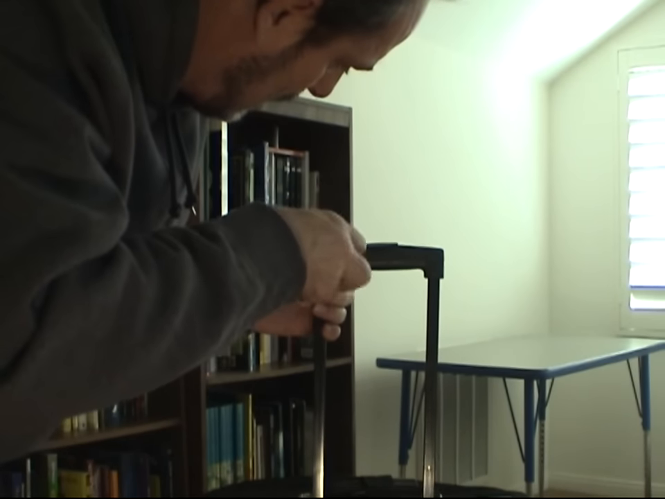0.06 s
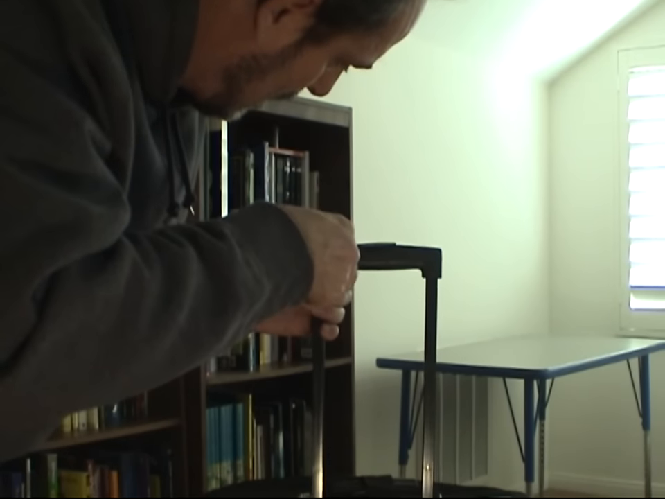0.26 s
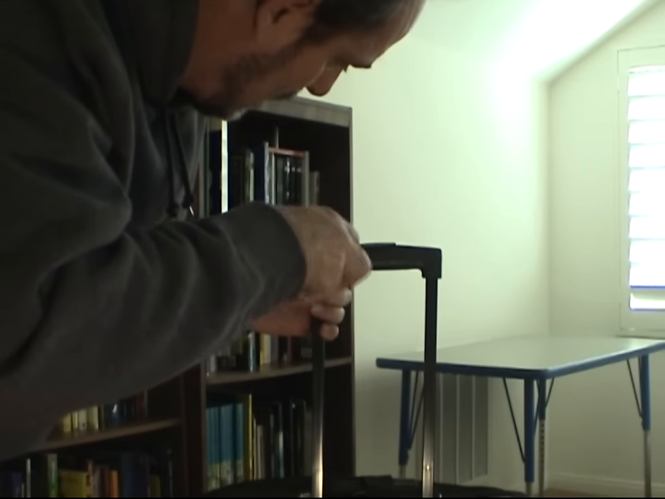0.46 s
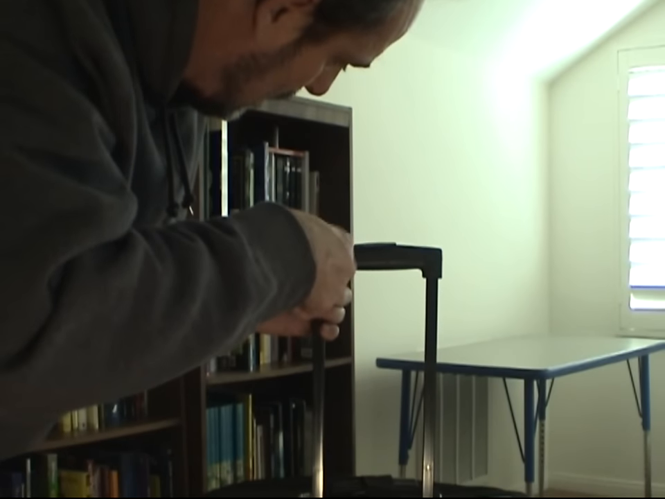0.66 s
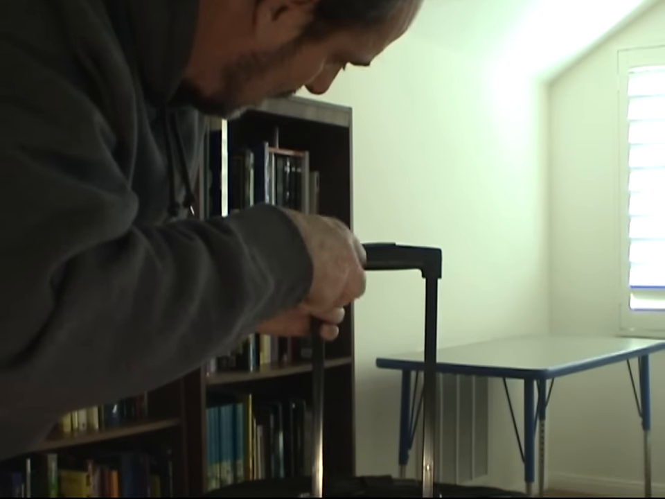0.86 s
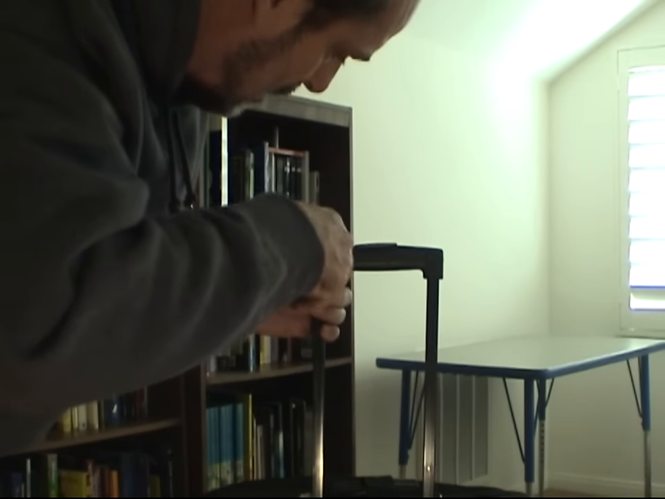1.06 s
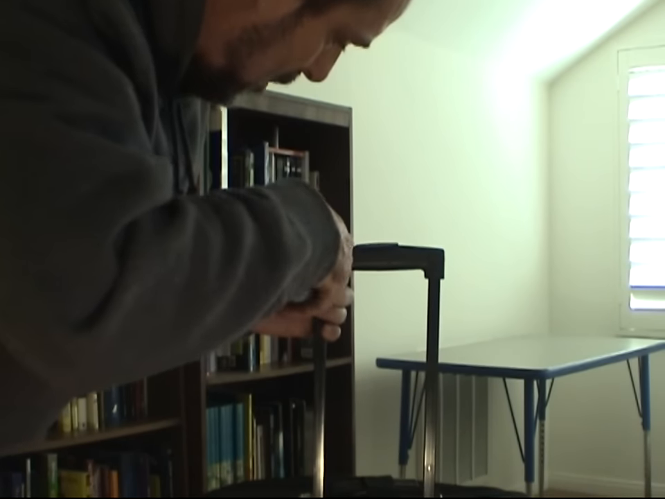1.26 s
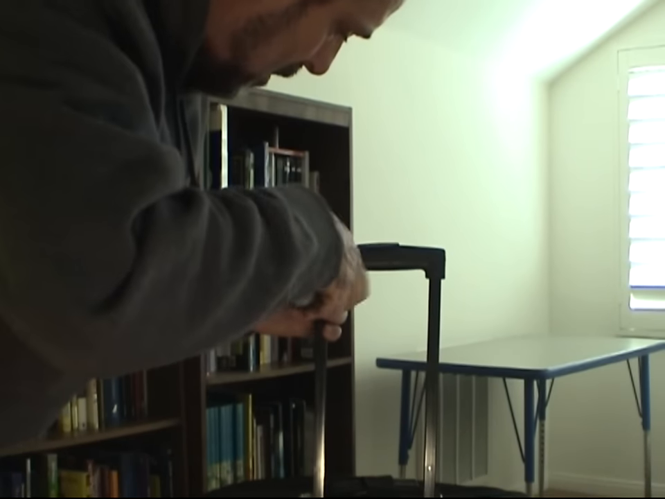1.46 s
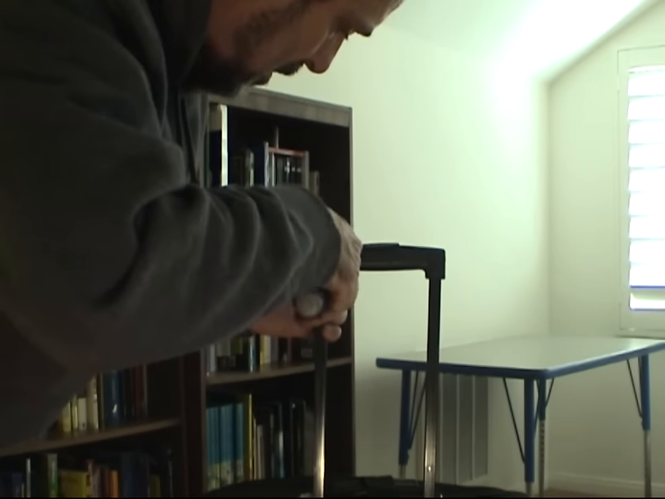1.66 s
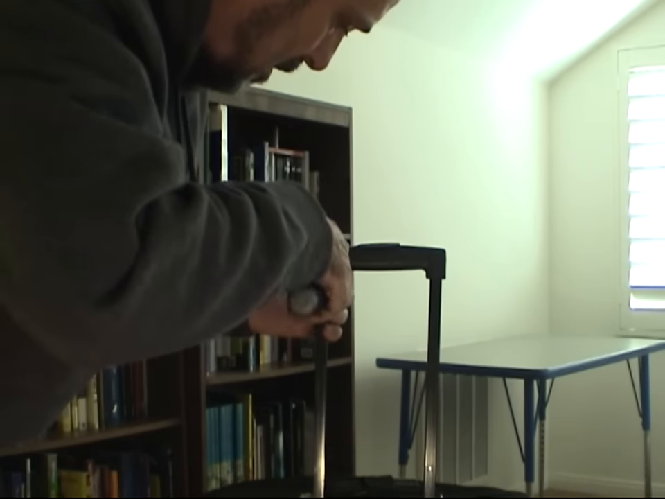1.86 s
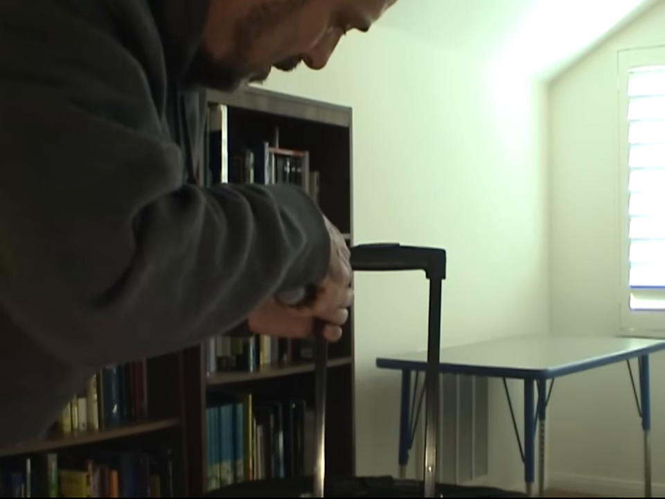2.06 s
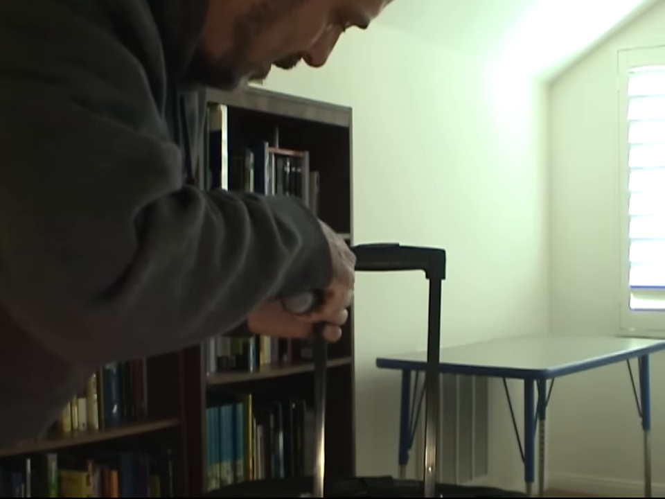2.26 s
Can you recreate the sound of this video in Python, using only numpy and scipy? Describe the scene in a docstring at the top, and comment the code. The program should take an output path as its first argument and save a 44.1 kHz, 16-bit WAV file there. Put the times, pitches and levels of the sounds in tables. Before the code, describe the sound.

A telescopic luggage handle clicks as it is worked by hand. The hollow grip knocks and bounces at 0.2 seconds, then the catch snaps sharply three times between 0.6 and 0.75. More snaps come at 1.3, 1.6, 1.7 and 2.0 seconds, with a softer one at 2.1. Faint creaking and rubbing occur around 1.5 to 1.7. Low hum, soft hiss and a thin motor whine continue in the small room.

```python
"""A small quiet room, where a telescopic luggage handle is worked by hand.
The hollow grip knocks once, bounces and settles; then the catch snaps sharply, most often just
after a light tick as it takes up its play. Each contact is a noise burst plus ringing modes.
Hand and sleeve rub the grip, and the tube creaks faintly under strain.
Under it lie a low room hum, soft hiss and the thin whine of a small motor."""
import sys
import numpy as np
from scipy import signal
from scipy.io import wavfile

SR = 44100
rng = np.random.default_rng(int(sys.argv[2]) if len(sys.argv) > 2 else 0)


def file_out(sig):
    """Save sig as 16-bit WAV at sys.argv[1]."""
    # one column per channel
    cols = np.atleast_2d(sig).T
    # limit, then scale
    lim = np.clip(cols, -1, 1)
    pcm = np.round(lim * 32767).astype(np.int16)
    wavfile.write(sys.argv[1], SR, pcm)


N = 101429
T = np.arange(N) / SR
HIT_T = T[:SR // 2]
CUTOFF_HZ, RATTLE_HOLD_S = 16200, 0.0012
EDGES_HZ = np.geomspace(22, 17500, 40)
CENTRES_HZ = np.sqrt(EDGES_HZ[1:] * EDGES_HZ[:-1])
BANK = [signal.butter(2, edge, "band", fs=SR, output="sos") for edge in zip(EDGES_HZ, EDGES_HZ[1:])]

# catch snaps: start_s, level_db, body_db, mid_db, top_db, decay_s, 3 x (pitch_hz, ring_db)
SNAPS = [(0.6047, -22.5, -1.5, -1, 2.5, 0.0016, 5150, -24, 7400, -21, 3080, -28.5),
         (0.6495, -22, -2, 0.5, -2, 0.0011, 2100, -25.5, 5260, -29, 8000, -26.5),
         (0.7447, -24, -8.5, -3, -0.5, 0.0014, 4280, -22.5, 8130, -21, 7180, -26),
         (0.913, -54.5, 11, 12, -9, 0.0053, 2310, -41.5, 1340, -52, 910, -43.5),
         (1.302, -28, -2.5, 2, 1, 0.0036, 2095, -28.5, 4050, -27, 1600, -32),
         (1.6352, -27, 3.5, -1, 1.5, 0.0039, 5080, -25, 4690, -26, 2480, -30),
         (1.7033, -26, 0.5, 4, 1.5, 0.0013, 4620, -22, 1690, -32, 2430, -28.5),
         (1.9766, -25.5, 5.5, -0.5, -1, 0.0019, 3950, -19, 2330, -23, 4680, -25),
         (2.0909, -37.5, 7.5, 2, 2.5, 0.0019, 4030, -29.5, 2340, -48, 1650, -42)]


def from_db(db):
    """Decibels to gain."""
    return 10 ** (np.asarray(db) / 20)


def at_hz(points, hz):
    """Interpolate a table over log frequency."""
    points_hz, values = np.transpose(points)
    return np.interp(np.log(hz), np.log(points_hz), values)


def add(track, start_s, sound):
    """Mix a sound in at start_s."""
    start = int(start_s * SR)
    track[start:start + len(sound)] += sound[:len(track) - start]


def noise_bands(size):
    """Quarter-octave noise bands, rms 1 each; neighbours uncorrelated."""
    run_in = SR // 20
    white = rng.standard_normal((3, size + run_in))
    bands = np.array([signal.sosfilt(band, white[k % 3])[run_in:] for k, band in enumerate(BANK)])
    return bands / np.sqrt(np.mean(bands ** 2, axis=1, keepdims=True) + 1e-20)


def band_gains(spectrum):
    """Spectral density to band gains, total power 1."""
    gains = from_db(at_hz(spectrum, CENTRES_HZ)) * np.sqrt(np.diff(EDGES_HZ))
    return gains / np.linalg.norm(gains)


def stereo_bands(size, correlation):
    """Noise bands with a tabulated left-right correlation."""
    alike = np.clip(at_hz(correlation, CENTRES_HZ)[:, None], -0.99, 0.99)
    mid = np.sqrt((1 + alike) / 2) * noise_bands(size)
    side = np.sqrt((1 - alike) / 2) * noise_bands(size)
    return np.array([mid + side, mid - side])


def ring(pitch_hz, level_db, t60_s):
    """One struck mode."""
    return from_db(level_db - 60 * HIT_T / t60_s) * np.sin(2 * np.pi * pitch_hz * HIT_T)


def burst(gains, decay_s, rise_s=0.00017, body_cycles=5.3):
    """Dense vibration: holds while parts chatter, then dies fast, lows last."""
    t = HIT_T[:SR // 10]
    band_decay_s = decay_s + body_cycles / CENTRES_HZ[:, None]
    envelope = (1 - np.exp(-t / rise_s)) * np.exp(-np.maximum(t - RATTLE_HOLD_S, 0) / band_decay_s)
    bands = noise_bands(len(t)) * envelope
    bands /= np.linalg.norm(bands, axis=1, keepdims=True)
    return gains @ bands * np.sqrt(decay_s * SR / 2)


def room_hum(level_db=-51, sink_db_per_s=1.2, hum_below_hz=2200):
    """Low hum, slowly sinking, with steady hiss."""
    # hum and hiss: freq_hz, density_db
    spectrum = [(25, -14), (60, -1), (100, -9.5), (145, -0.5), (230, 0), (300, -2), (570, -4), (680, -7.5),
                (980, -11), (1130, -6), (1450, -9.5), (1700, -14.5), (3300, -14.5), (4200, -9),
                (6000, -11.5), (7000, -18), (9000, -19), (11000, -28.5), (16000, -32.5)]
    # left-right likeness: freq_hz, correlation
    correlation = [(30, -0.47), (70, -0.32), (140, 0.32), (300, 0.23), (1200, -0.25), (2400, -0.16),
                   (5000, 0.9), (14000, 1)]
    hum_share = 1 / (1 + (CENTRES_HZ[:, None] / hum_below_hz) ** 2)
    sink = from_db(-sink_db_per_s * (T - T.mean()) * hum_share)
    return from_db(level_db) * band_gains(spectrum) @ (sink * stereo_bands(N, correlation))


def motor(weak_count=60, waver_hz=1.24, whine_gain_db=0.5):
    """Small motor: thin, slightly wavering tones among many weaker ones."""
    # whine tones: pitch_hz, level_db
    whine = [(2519, -76), (2950, -75), (3025, -74), (3526, -67), (3714, -71), (3984, -68), (4032, -65),
             (4091, -67), (4188, -67), (4285, -71), (4457, -69), (4549, -71), (4630, -68), (5039, -70),
             (5120, -70), (5233, -72), (5712, -70), (6051, -70), (6665, -77), (7138, -76), (7235, -75),
             (7520, -78), (8850, -76), (8947, -76)]
    # low tones: pitch_hz, rms_db
    drone = [(265, -74), (571, -70), (1100, -71.5), (1150, -72.5)]
    # envelope of the weak partials: freq_hz, rms_db
    weak = [(2900, -86), (3800, -95), (4100, -70.5), (5000, -83), (6000, -73), (7000, -103), (9300, -79)]
    weak_hz = np.geomspace(weak[0][0], weak[-1][0], weak_count) * (1 + rng.normal(0, 0.0043, weak_count))
    tones = [(hz, db + whine_gain_db) for hz, db in whine] + drone
    tones += zip(weak_hz, at_hz(weak, weak_hz))
    knots_s = np.linspace(0, T[-1], 60)
    out = np.zeros(N)
    for hz, rms_db in tones:
        pitch_hz = hz + waver_hz * np.interp(T, knots_s, rng.standard_normal(len(knots_s)))
        cycles = np.cumsum(pitch_hz) / SR + rng.random()
        out += np.sqrt(2) * from_db(rms_db) * np.sin(2 * np.pi * cycles)
    return out


def rubs():
    """Hand and sleeve shift on the grip: soft, dull swells."""
    # shifts: centre_s, half_length_s, level_db
    shifts = [(0.032, 0.043, -53.5), (1.586, 0.01, -51), (1.673, 0.042, -52.5)]
    # rubbing noise: freq_hz, density_db
    spectrum = [(80, -15), (160, 3), (380, 7.5), (600, -12.5), (1500, -11), (3000, -33)]
    swell = sum(from_db(db) * np.exp(-((T - centre_s) / half_s) ** 2) for centre_s, half_s, db in shifts)
    return swell * (band_gains(spectrum) @ noise_bands(N))


def creak(start_s=1.478, gap_s=0.026, slips=5):
    """Uneven slips under strain, each briefly ringing the tube."""
    out = np.zeros(N)
    for k, (jitter, offset_db) in enumerate(rng.standard_normal((slips, 2))):
        slip = ring(pitch_hz=1435, level_db=-53.5 + offset_db, t60_s=0.027)
        add(out, start_s + gap_s * (k + jitter / 10), slip)
    return out


def grip_knock(thud_db=-4):
    """A knock and its bounces ring the hollow grip and tubes."""
    # impacts: start_s, level_db
    knocks = [(.2074, -18.2), (.2272, -31.5), (0.44, -45.5)]
    # grip and tube modes: pitch_hz, gain_db, t60_s
    modes = [(158.5, -21, 0.11), (328.4, -12.5, 0.076), (386, -19, 0.21), (433, -8.5, 0.059),
             (530, -5.5, 0.066), (730, -15, 0.032), (867, -10.5, 0.034), (1022, -8.5, 0.024),
             (1150, -16, 0.052), (1710, -12.5, 0.0063), (2320, -5.5, 0.015), (3650, -14.5, 0.0075),
             (6540, -9.5, 0.0059)]
    # contact noise: freq_hz, density_db
    thud = [(150, 0), (500, 1.5), (1000, 6), (1400, -3), (2700, -12), (4500, -11), (7000, -12.5),
            (10000, -17.5), (16000, -38)]
    ringing = sum((-1) ** k * ring(*mode) for k, mode in enumerate(modes))
    out = np.zeros(N)
    for start_s, level_db in knocks:
        add(out, start_s, from_db(level_db) * ringing)
        add(out, start_s, from_db(level_db + thud_db) * burst(band_gains(thud), decay_s=0.0017))
    return out


def crack(level_db, body_db, mid_db, top_db, decay_s):
    """One contact of the catch, coloured by where it lands."""
    # contact noise: freq_hz, density_db
    spectrum = [(150, -7.5), (280, -8.5), (410, 8), (720, -10.5), (1100, -4), (1700, 0), (2300, 0.5),
                (2900, -7), (4200, 0), (7500, 1), (10500, -5), (13000, -6.5), (16000, -42)]
    colour_db = at_hz([(415, body_db), (1880, mid_db), (6400, 0), (12000, top_db)], CENTRES_HZ)
    return burst(band_gains(spectrum) * from_db(level_db + colour_db), decay_s)


def catch():
    """The catch ticks as it takes up its play, and snaps."""
    # light ticks: start_s, level_db
    ticks = [(0.6011, -35), (0.7328, -36.5), (1.2966, -44), (1.3015, -47), (1.6324, -39.5), (1.6886, -33),
             (1.966, -32.5)]
    # modes of a tick: pitch_hz, gain_db, t60_s
    tick_modes = [(4140, -4.5, .008), (10410, -1, 0.0064)]
    tick_ring = sum(ring(*mode) for mode in tick_modes)
    out = np.zeros(N)
    for start_s, level_db in ticks:
        add(out, start_s, crack(level_db, body_db=9.5, mid_db=6, top_db=3.5, decay_s=0.00082))
        add(out, start_s, from_db(level_db) * tick_ring)
    for start_s, level_db, body_db, mid_db, top_db, decay_s, *_ in SNAPS:
        add(out, start_s, crack(level_db, body_db, mid_db, top_db, decay_s))
    return out


def catch_rings(rise_s=0.0002, t60_s=0.0095):
    """Each snap's chatter starts three short rings in turn, giving it pitch."""
    attack = 1 - np.exp(-HIT_T / rise_s)
    out = np.zeros(N)
    for snap in SNAPS:
        start_s, rings = snap[0], snap[6:]
        for k, (pitch_hz, ring_db) in enumerate(zip(rings[::2], rings[1::2])):
            add(out, start_s + k * RATTLE_HOLD_S / 2, attack * ring(pitch_hz, ring_db, t60_s))
    return out


def reflections(send, low_t60_s=0.34, top_t60_s=0.17, build_s=0.0044, echo_highpass_hz=750):
    """Thin near echoes and a short room tail whose treble dies first."""
    # nearby surfaces: delay_s, gain_db, left_minus_right_db
    echoes = [(.0041, -8.5, 4.5), (0.0126, -19, -9), (0.0198, -14.5, 14), (.0217, -22.5, -30)]
    # room tail: freq_hz, gain_db
    spectrum = [(150, -2), (500, -5.5), (1500, -0.8), (2400, -4.5), (4000, -2.5), (8000, -4), (15000, -11)]
    # left-right likeness of the tail: freq_hz, correlation
    correlation = [(400, .82), (1100, .65), (4000, .85), (9000, .6)]
    t60_s = np.interp(CENTRES_HZ, [0, CUTOFF_HZ], [low_t60_s, top_t60_s])[:, None]
    envelope = from_db(-60 * HIT_T / t60_s) * (1 - np.exp(-HIT_T / build_s))
    tails = stereo_bands(len(HIT_T), correlation) * envelope
    tails /= np.linalg.norm(tails, axis=2, keepdims=True)
    gains = from_db(at_hz(spectrum, CENTRES_HZ)) * np.sqrt(2 * np.diff(EDGES_HZ) / SR)
    out = signal.fftconvolve(send[None], gains @ tails, axes=1)[:, :N]
    thin = signal.sosfilt(signal.butter(1, echo_highpass_hz, "high", fs=SR, output="sos"), send)
    for delay_s, gain_db, pan_db in echoes:
        add(out[0], delay_s, from_db(gain_db + pan_db / 2) * thin)
        add(out[1], delay_s, from_db(gain_db - pan_db / 2) * thin)
    return out


def scene(handle_highpass_hz=131, ring_send_db=-5):
    """The handle, with its deep bass cut away, in the room over hum and whine."""
    highpass = signal.butter(2, handle_highpass_hz, "high", fs=SR, output="sos")
    handle = signal.sosfilt(highpass, catch() + grip_knock() + rubs() + creak())
    rings = catch_rings()
    room = reflections(handle + from_db(ring_send_db) * rings)
    return handle + rings + room + room_hum() + motor()


def record(dry):
    """Steep low-pass."""
    return signal.sosfilt(signal.ellip(10, 0.1, 70, CUTOFF_HZ, fs=SR, output="sos"), dry)


dry = scene()
out = record(dry)
file_out(out)
```